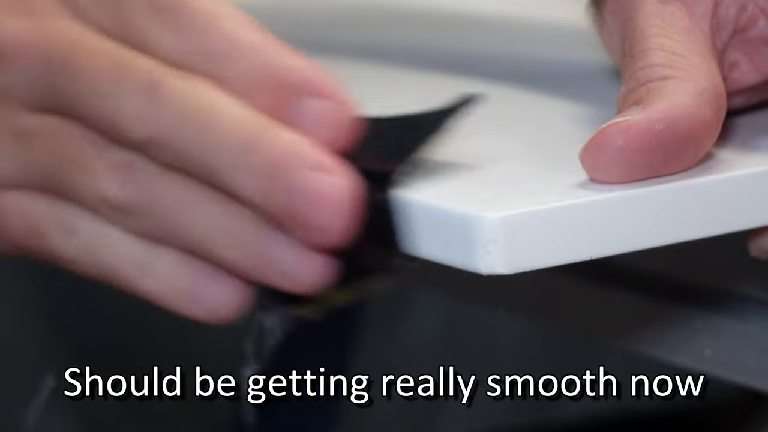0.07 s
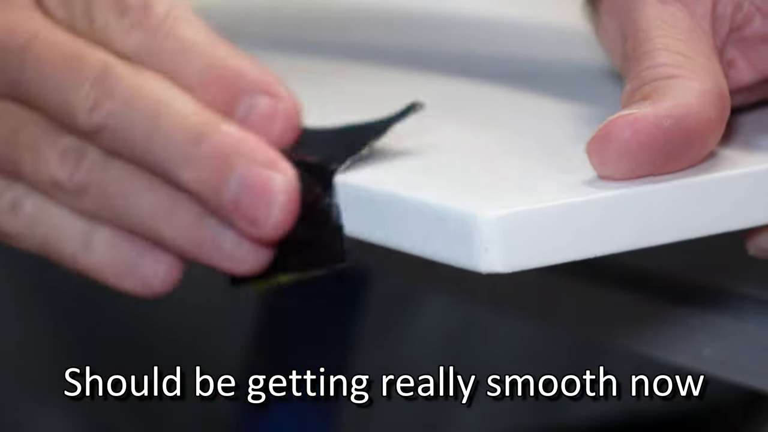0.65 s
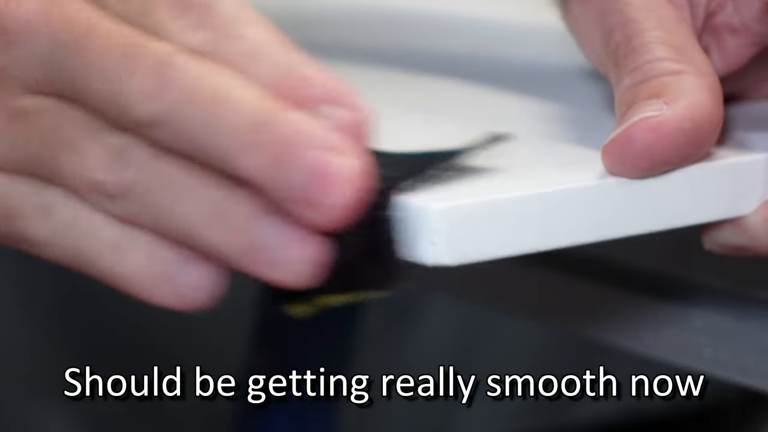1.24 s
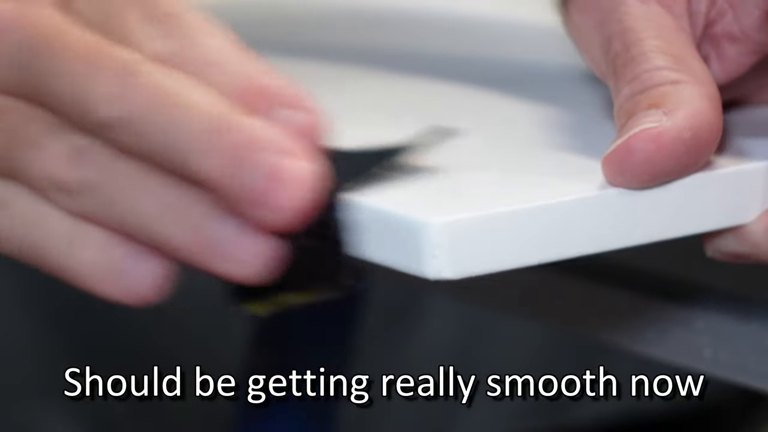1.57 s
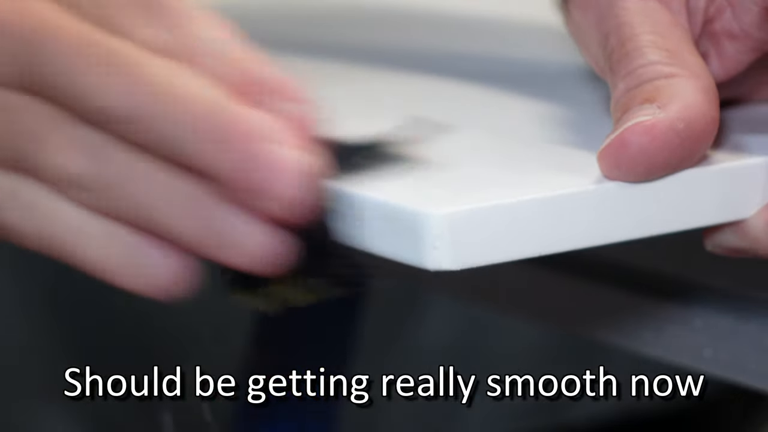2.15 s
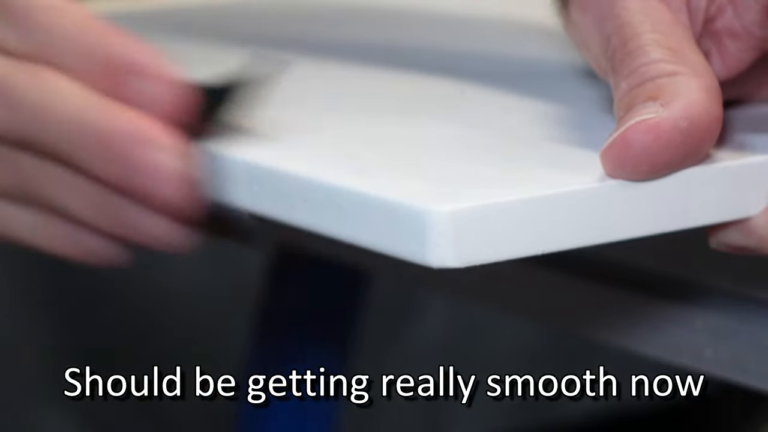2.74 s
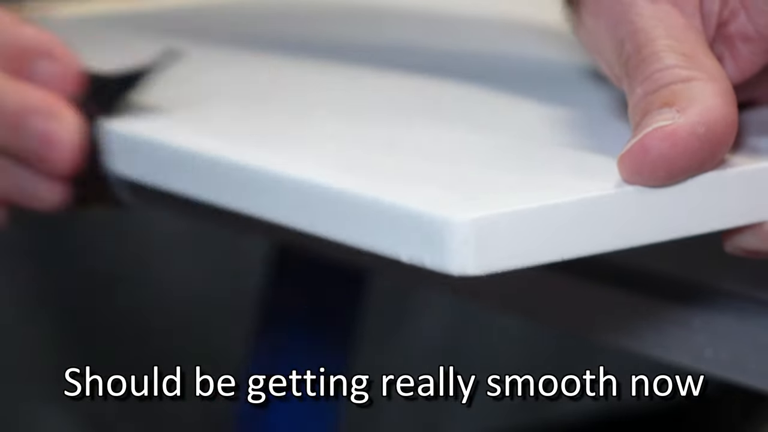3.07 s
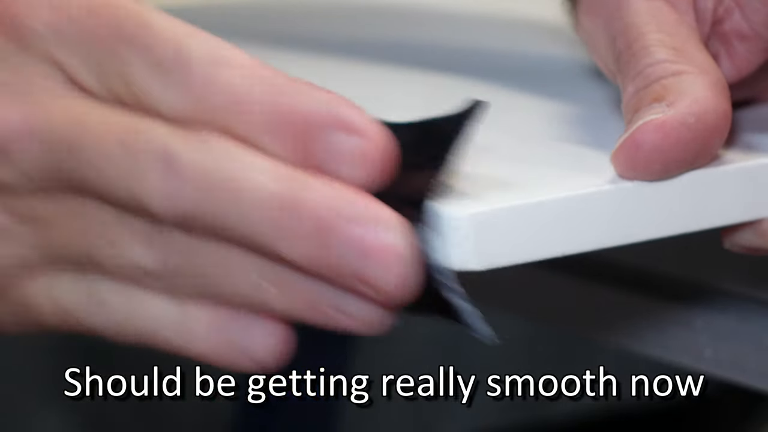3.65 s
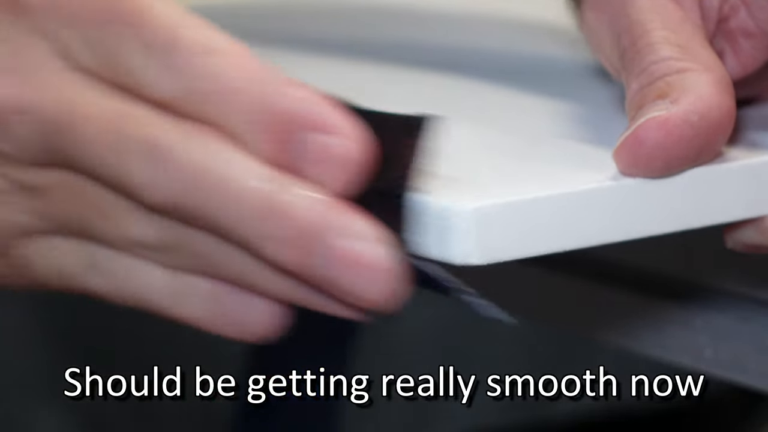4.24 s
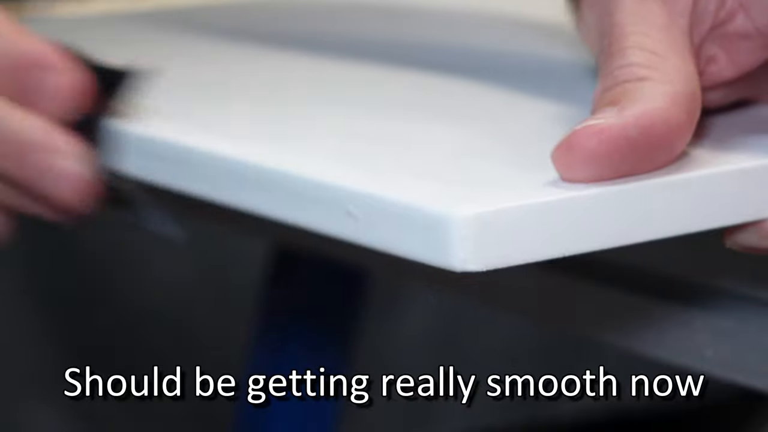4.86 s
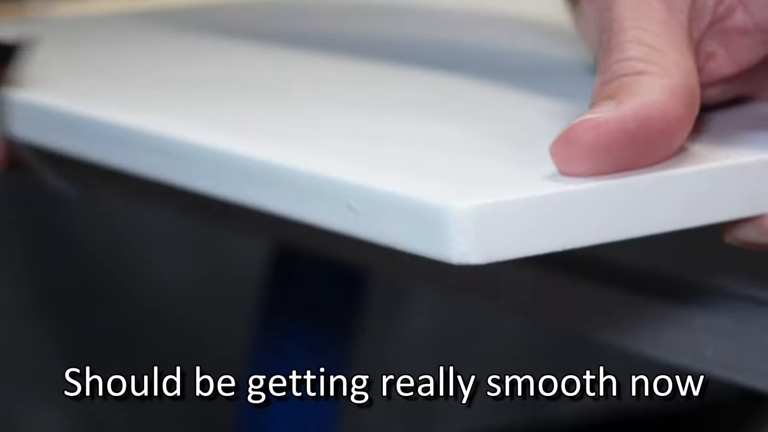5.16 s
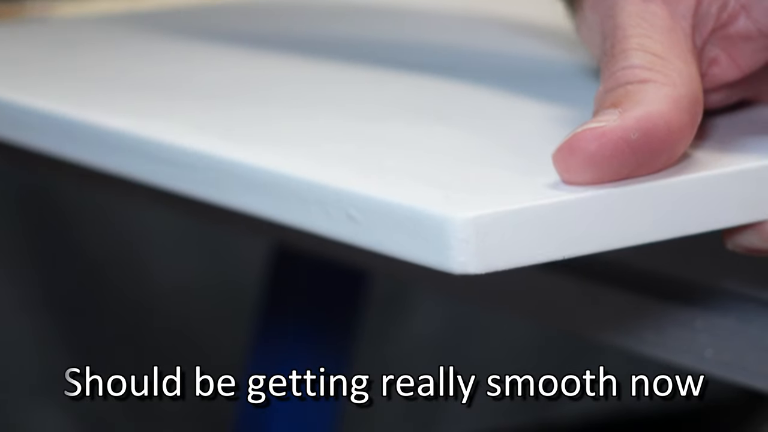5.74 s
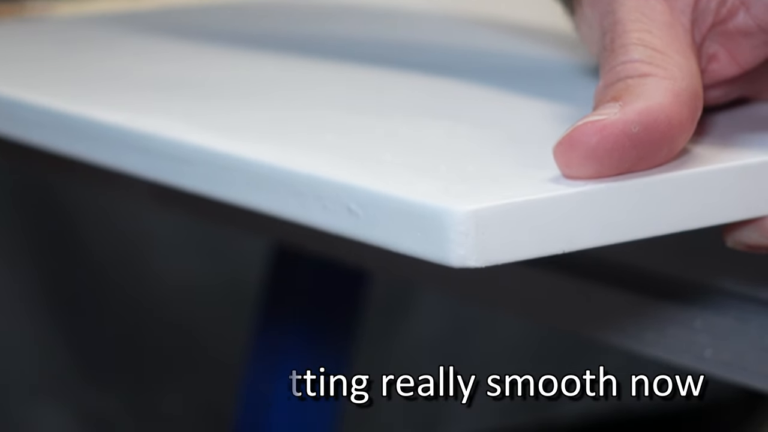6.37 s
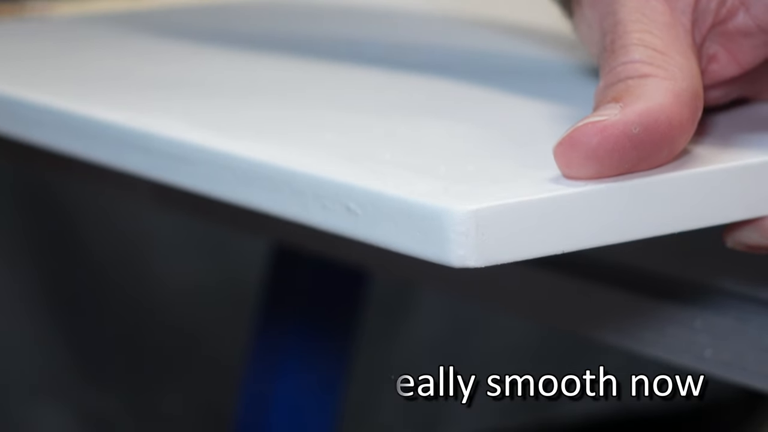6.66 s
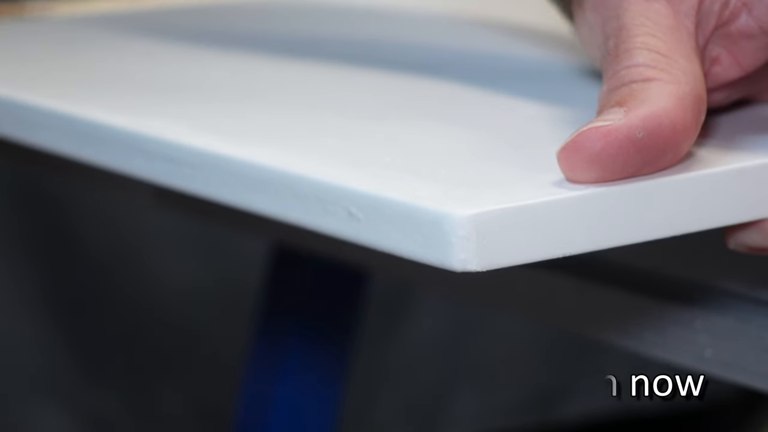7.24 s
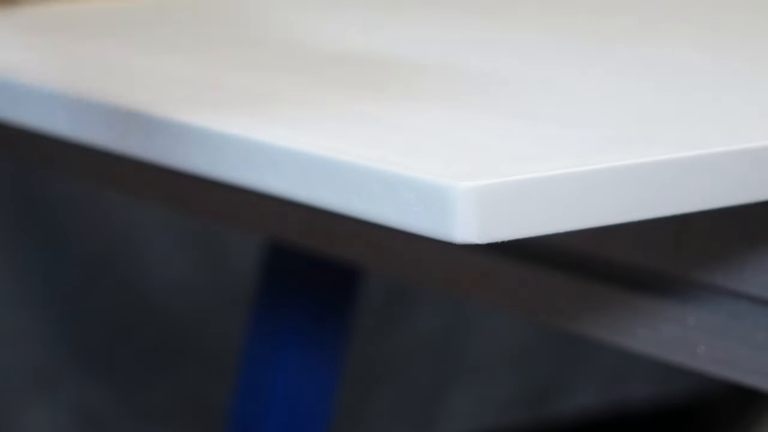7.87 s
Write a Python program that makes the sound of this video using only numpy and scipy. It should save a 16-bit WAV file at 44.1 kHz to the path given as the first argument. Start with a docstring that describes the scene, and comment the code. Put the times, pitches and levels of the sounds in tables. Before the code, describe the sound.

Wet sandpaper is rubbed by hand back and forth along the edge of a plastic board, close to the microphone. From the start the strokes come quickly, about six a second, each a bright, gritty hiss with a slight rasp, swelling and dying as the hand turns. From about 2 to 3.5 seconds they become longer, firmer and louder. Quick, lighter strokes return until one long sweep at about 4.7 seconds. After that the rubbing sounds duller, and between 5.8 and 6.6 seconds it is at its softest, with short, fast strokes. It firms up again at about 6.6 seconds, eases gradually and cuts off mid-stroke at 7.7 seconds. The tone of the scraping shifts a little as the paper bends under the fingers. Short workshop reflections surround the strokes, and a faint, steady low rumble and ventilation hum run underneath.

```python
"""Wet sandpaper, rubbed by hand back and forth along the edge of a plastic board, close to a mono microphone.
Each stroke swells and dies with the speed of the hand; the grit hisses through the board and the bent paper.
The place is a workshop: short reflections off bench and walls, a low rumble and hums underneath.
The sound cuts off in the middle of the last stroke."""
import sys
import numpy as np
from scipy import signal
from scipy.fft import rfft, irfft
from scipy.io import wavfile
from scipy.ndimage import uniform_filter1d

SR = 44100
rng = np.random.default_rng(int(sys.argv[2]) if len(sys.argv) > 2 else 0)


def pcm_store(signal):
    """Save signal as 16-bit PCM."""
    levels = np.round(np.clip(np.atleast_2d(signal), -1, 1) * 32767)
    wavfile.write(sys.argv[1], SR, levels.astype(np.int16).T)


N = 348831


def amp(db):
    """Decibels to gain."""
    return 10 ** (np.asarray(db) / 20)


def unit_rms(x):
    """Scales to rms 1."""
    return x / np.sqrt(np.mean(x ** 2) + 1e-20)


def at_hz(table, hz):
    """Reads a table along a logarithmic frequency axis."""
    table_hz, values = np.transpose(table)
    return np.interp(np.log(hz + 1), np.log(table_hz + 1), values)


def at_time(table, t):
    """Reads each column of a table at the times t."""
    times, *columns = np.transpose(table)
    return [np.interp(t, times, column) for column in columns]


def bell(hz, centre_hz, width_hz):
    """Bell of a resonance, height 1."""
    return 1 / (1 + (2 * (hz - centre_hz) / width_hz) ** 2)


def hump(hz, centre_hz, octaves):
    """Broad hump on a logarithmic frequency axis, height 1."""
    return np.exp(-(np.log2((hz + 1) / centre_hz) / octaves) ** 2)


def grit(coarse_share=0.13, coarse_per_s=6000, chatter_db=0.34):
    """Countless fine grains make a hiss, coarser ones tick, and the contact chatters slightly."""
    ticks = unit_rms(rng.standard_normal(N) * (rng.random(N) < coarse_per_s / SR))
    chatter = unit_rms(uniform_filter1d(rng.standard_normal(N), size=120))
    hiss = rng.standard_normal(N)
    return (np.sqrt(1 - coarse_share) * hiss + np.sqrt(coarse_share) * ticks) * amp(chatter_db * chatter)


def hand_swing(t, start, length, jerk, skew, creep=0.09, jerk_s=0.025):
    """The hand swings like a pendulum; the paper sticks at each turn and breaks away with a jerk."""
    age = np.maximum(t - start, 0)
    progress = np.clip(age / length, 0, 1)
    swing = np.maximum(np.sin(np.pi * progress ** skew), creep)
    speed = np.hypot(swing, jerk * np.exp(-age / jerk_s))
    return progress, speed


def contact_drift(shape, frames=60, bins=4):
    """The contact shifts under the fingers, so the colour drifts in smooth random patches, rms 1."""
    slow_noise = uniform_filter1d(rng.standard_normal(shape), frames, axis=0)
    return unit_rms(uniform_filter1d(slow_noise, bins, axis=1))


def sanding(level_db=-44, glide_db=3.0, dulling_db_per_octave=0.5, drift_db=1.39):
    """Close up, the grit sounds through the paper, louder and brighter the faster the hand moves."""
    # Strokes, away and back in turn. Each row: start in seconds, length in seconds, pressure in dB.
    strokes = [(-.088, 0.16, 2.5), (0.081, 0.15, 1.5), (0.235, 0.14, 2), (0.397, .135, 2.5),
               (0.545, 0.15, 4), (0.725, 0.15, 1), (0.899, .13, -3), (1.078, 0.13, -0.5), (1.236, 0.15, 2),
               (1.415, 0.12, 0.7), (1.564, 0.14, 3), (1.729, .146, 1.5), (1.891, .202, 4),
               (2.109, 0.22, 3.5), (2.321, 0.32, 6.5), (2.641, .315, 5.5), (2.951, 0.23, 5),
               (3.184, 0.23, 5.5), (3.418, 0.16, 4.5), (3.602, .157, 2.1), (3.774, 0.13, 0),
               (3.926, 0.16, 0.5), (4.098, 0.13, .6), (4.253, 0.13, -1), (4.401, 0.13, -0.2),
               (4.559, 0.12, -0.6), (4.713, 0.42, 3.5), (5.116, .175, 1.8), (5.295, 0.18, 2),
               (5.478, .146, 0.2), (5.629, 0.19, 1.3), (5.824, 0.1, -4), (5.953, 0.13, -2.8),
               (6.091, 0.1, -4.7), (6.212, 0.12, -4.5), (6.354, .11, -5.1), (6.483, 0.11, -6.4),
               (6.621, 0.17, 0), (6.788, 0.15, 0.8), (6.954, 0.12, -0.5), (7.078, 0.15, -1.6),
               (7.239, 0.12, -1.7), (7.368, 0.14, -2.4), (7.517, 0.14, -2.5), (7.648, .099, -6)]
    # Away, then back. Each row: jerk as a share of full speed, skew (under 1 is fastest early),
    # hollow tone in dB, low rasp in dB.
    directions = [(0.329, 0.764, -0.47, -0.14), (.42, 0.754, 0.14, 0.4)]
    # Colour of paper on board at full speed. Each row: frequency in Hz, relative level in dB.
    scrape = [(200, -5.5), (500, -21.5), (800, -17.5), (1300, -8), (2100, -9), (3200, -3.5), (4400, -3),
              (5200, -5), (6800, -5), (9800, -6), (11700, -8.5), (12600, -11.5), (13600, -13), (15500, -22)]
    # How steeply each band follows the hand's speed. Each row: frequency in Hz, exponent.
    speed_law = [(500, 0.87), (1600, 0.72), (3000, 0.76), (5000, 0.94), (8000, 0.97), (14000, 1.36)]
    # The treble dulls as the work goes on. Each row: time in seconds, slope in dB per octave.
    treble = [(0, 4), (.4, 4.5), (1, 2), (1.45, 3.5), (2.6, 3), (3.7, 1.1), (4.3, 1.5), (5.6, -2),
              (6, -2.9), (6.65, -2.4), (7.6, -1)]
    # Hollow tone under the fingers. Each row: time in seconds, height in dB.
    hollow = [(.4, 2), (1.07, -1), (1.5, -.5), (2.65, 0.6), (3.42, -1.5), (3.93, 3.5), (4.56, 2.5),
              (4.72, -0.3), (6, -1.7), (7.6, 0.5)]
    # Resonance of the paper, bent anew by the fingers. Each row: time in seconds, pitch in Hz, height in dB.
    paper = [(.24, 5000, 4), (.55, 4200, 6), (.73, 4650, 6), (.9, 6000, 2), (1.24, 6030, 4.5),
             (1.42, 6200, 5.5), (2.32, 6500, 3.4), (2.65, 4050, 4.5), (3.18, 4100, 4.5), (3.78, 3900, 1.5),
             (4.4, 3900, -0.5), (4.56, 3900, 6.5), (4.72, 4650, 2.6), (6.5, 4600, 1.5), (6.8, 4600, 4.5),
             (7.6, 4600, 2.2)]
    # Low rasp. Each row: time in seconds, height in dB.
    rasp = [(.08, 5.5), (.4, 6), (1, 0.3), (1.45, 3), (2.4, 1), (3.4, 0.2), (4, 2.5), (4.56, 2),
            (5.3, -3.5), (5.95, -3.5), (6.5, -1.5), (7.6, -1.8)]

    hz, t, grit_spectra = signal.stft(grit(), SR, nperseg=256, noverlap=224)
    stroke = np.clip(np.searchsorted(np.array(strokes)[:, 0], t) - 1, 0, len(strokes) - 1)
    start, length, pressure_db = np.array(strokes)[stroke].T[:, :, None]
    jerk, skew, turn_hollow_db, turn_rasp_db = np.array(directions)[stroke % 2].T[:, :, None]
    # a firm stroke reaches full speed later; a long one reaches it early and then coasts
    skew = skew + 0.02 * pressure_db - 0.12 * np.log2(length / 0.15)
    progress, speed = hand_swing(t[:, None], start, length, jerk, skew)

    # the grip is taken at each turn and held through the stroke
    treble_slope = at_time(treble, start)[0]
    hollow_db = at_time(hollow, start)[0] + turn_hollow_db
    paper_hz, paper_db = at_time(paper, start)
    # pressing adds hiss, hardly any rasp
    rasp_db = at_time(rasp, start)[0] + turn_rasp_db - 0.93 * pressure_db
    # the rasp gives way at full speed, when the paper glides on its film of water
    rasp_db += glide_db * (0.5 - speed ** 4)
    # the grit bites brightest early in the stroke
    treble_slope += dulling_db_per_octave * (0.5 - progress)

    colour_db = at_hz(scrape, hz) + treble_slope * np.log2(np.maximum(hz, 4000) / 6000)
    colour_db += hollow_db * hump(hz, centre_hz=3740, octaves=0.49)
    colour_db += paper_db * bell(hz, paper_hz, width_hz=640)
    colour_db += rasp_db * hump(hz, centre_hz=1480, octaves=0.78)
    colour_db += drift_db * contact_drift(colour_db.shape)
    gain = amp(level_db + pressure_db + colour_db) * speed ** at_hz(speed_law, hz)
    return signal.istft(grit_spectra * gain.T, SR, nperseg=256, noverlap=224)[1][:N]


def board(x, bounce_s=0.000506, bounce_share=0.088):
    """The board rings faintly, and a bounce off a near surface ripples the spectrum at the microphone."""
    # Resonances of the plastic. Each row: frequency in Hz, width in Hz, height in dB.
    resonances = [(1600, 170, 5.5), (2560, 140, 2.5), (3140, 150, 3), (4490, 380, 2.5), (5780, 830, 2),
                  (8050, 500, 1.5)]
    hz = np.fft.rfftfreq(N, 1 / SR)
    ring_db = sum(db * bell(hz, centre, width) for centre, width, db in resonances)
    ripple = 1 + bounce_share * np.exp(-2j * np.pi * hz * bounce_s)
    return irfft(rfft(x) * amp(ring_db) * ripple, N)


def room_tail(reflections_per_s=3000):
    """Sparse reflections from bench and walls, the highest treble dying first."""
    # Decay of the workshop. Each row: frequency in Hz, seconds to fall by 60 dB.
    decay = [(250, 0.79), (2000, 0.28), (6000, 0.43), (14000, 0.15)]
    taps = rng.choice([-1., 1.], SR // 2) * (rng.random(SR // 2) < reflections_per_s / SR)
    taps[:100] = 0  # the direct sound reaches the microphone first
    hz, t, spectra = signal.stft(taps, SR, nperseg=256)
    fade = amp(-60 * t / at_hz(decay, hz)[:, None])
    tail = signal.istft(spectra * fade, SR, nperseg=256)[1]
    return tail / np.linalg.norm(tail)


def room(x, wet_db=-11, drift_hz=2.3, sets=4):
    """As the hand travels, the sound passes from one set of reflections to the next."""
    place = drift_hz * np.arange(N) / SR
    shares = [np.maximum(np.sin(2 * np.pi * (place + k / sets)), 0) for k in range(sets)]
    reflections = sum(signal.fftconvolve(x * share, room_tail())[:N] for share in shares)
    return x + amp(wet_db) * reflections


def workshop(rumble_db=-51.5, hum_width_hz=9):
    """Room tone: a low rumble with narrow, wavering hums, as of ventilation."""
    # Colour of the rumble. Each row: frequency in Hz, relative level in dB.
    rumble_colour = [(12, -26), (21, 1.5), (29, 3.5), (41, -17), (58, -0.5), (74, -3.5), (100, -3.5),
                     (145, -8), (200, -16.5), (310, -22), (470, -20.5), (760, -30.5), (1050, -28.5),
                     (2000, -39.5), (8000, -39), (15000, -58)]
    # Standing hums. Each row: frequency in Hz, rms level in dB.
    hum_lines = [(27.5, -59.5), (59, -62.5), (92, -60.5), (119, -62.5), (240, -73.5), (354, -78),
                 (416, -74.5), (459, -77), (526, -73), (641, -77.5), (673, -86), (1001, -78.5), (1925, -88)]
    hz = np.fft.rfftfreq(N, 1 / SR)
    rumble = irfft(rfft(rng.standard_normal(N)) * amp(at_hz(rumble_colour, hz)), N)
    hum_gain = sum(amp(db) * unit_rms(bell(hz, centre, hum_width_hz)) for centre, db in hum_lines)
    hums = irfft(rfft(rng.standard_normal(N)) * hum_gain, N)
    return amp(rumble_db) * unit_rms(rumble) + hums


def scene():
    """Sanding up close over the room tone; one microphone feeds both channels."""
    mono = room(board(sanding())) + workshop()
    return np.array([mono, mono])


def record(dry, end_s=7.696, fade_s=0.004, top_hz=15720):
    """The sound stops abruptly, and a steep low-pass takes off the highest treble."""
    gate = np.clip((end_s - np.arange(N) / SR) / fade_s + 0.5, 0, 1)
    low_pass = signal.firwin(801, top_hz, window=("kaiser", 9), fs=SR)
    return signal.oaconvolve(dry * gate, low_pass[None], "same")


dry = scene()
out = record(dry)
pcm_store(out)
```